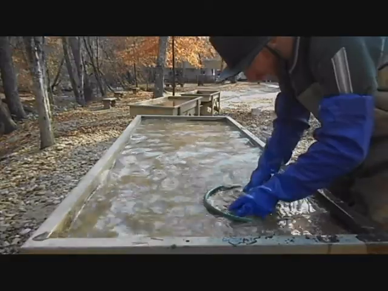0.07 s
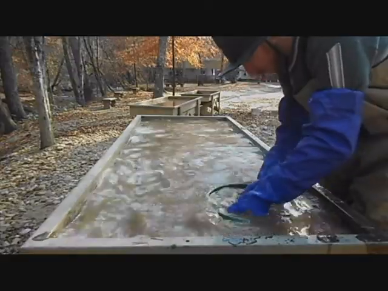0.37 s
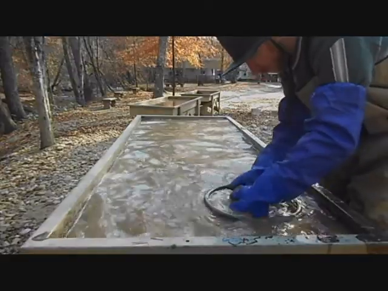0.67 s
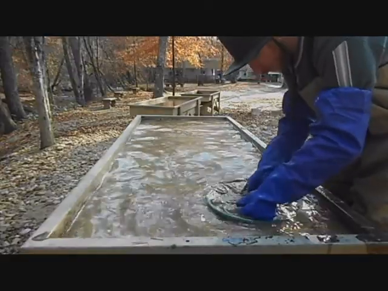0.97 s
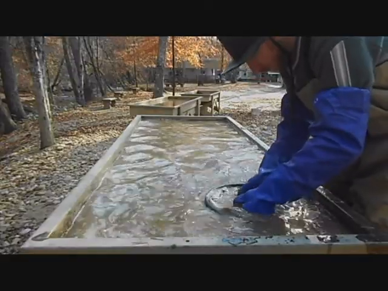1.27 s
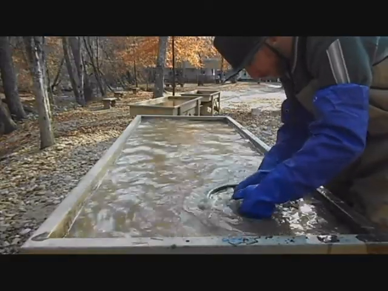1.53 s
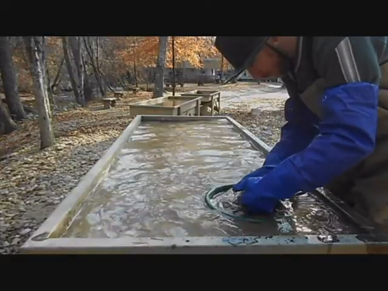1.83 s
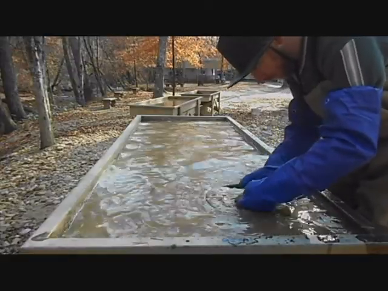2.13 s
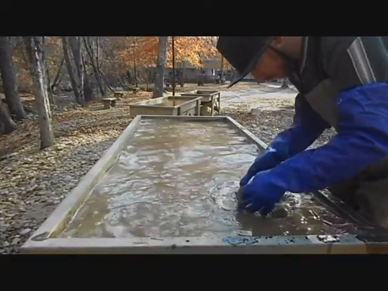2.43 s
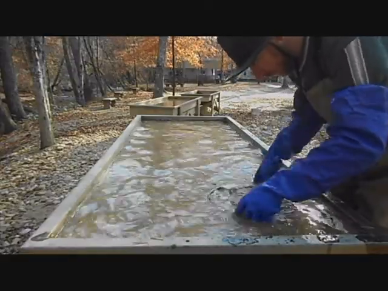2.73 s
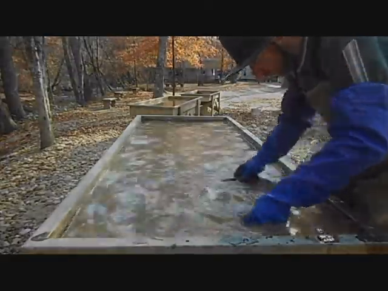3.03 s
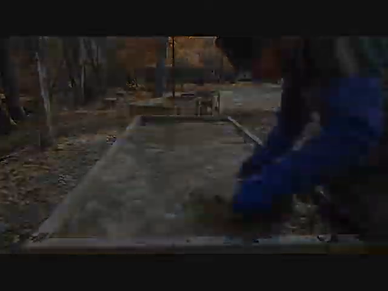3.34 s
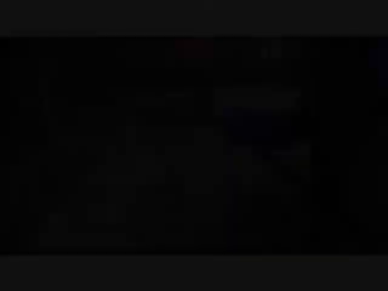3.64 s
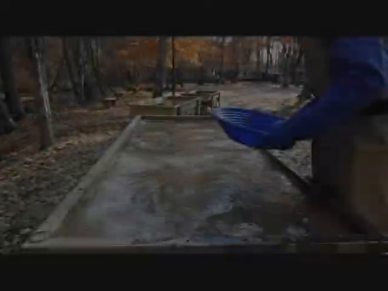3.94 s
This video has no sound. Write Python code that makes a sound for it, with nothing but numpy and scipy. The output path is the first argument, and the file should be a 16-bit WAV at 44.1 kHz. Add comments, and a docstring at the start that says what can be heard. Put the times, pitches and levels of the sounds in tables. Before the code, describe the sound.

Sloshing water in a trough as someone swirls a pan, with small plops and gritty clicks.

```python
"""Water churns as a prospector's pan is swirled in a muddy outdoor trough, throwing spray that falls back
in single plops. Air bubbles in the water ring as damped resonators; countless small splashes sum to noise.
Fine grit hisses and stones click in the pan, the pan is dunked with dull bumps, and a light wind rumbles
on the microphone. Near the end the whole sound fades away briefly and comes back."""
import sys
import numpy as np
from scipy import signal
from scipy.fft import rfft, irfft, next_fast_len
from scipy.io import wavfile
from scipy.ndimage import uniform_filter1d, map_coordinates

SR = 44100
rng = np.random.default_rng(int(sys.argv[2]) if len(sys.argv) > 2 else 0)


def transcribe(u):
    """Save the signal u as a 16-bit wav file named by the first command-line argument.

    u: samples, shape (n,) or (channels, n), limited to [-1, 1]; the rate is SR.
    q: integer samples, one column per channel.
    """
    v = np.clip(np.atleast_2d(u).T, -1, 1)
    q = np.round(v * 32767).astype(np.int16)
    wavfile.write(sys.argv[1], SR, q)


N = 176400
BUBBLE_RISE = 0.15  # fraction by which a small bubble's pitch climbs during its life


def churn():
    """Bubble resonance: water rolling round the pan traps large air pockets that ring within its wash."""
    # strength of the churning (time [s], level [dB])
    envelope = [(0.0, -31.5), (0.18, -24.5), (0.43, -27.5), (0.66, -27.5), (0.87, -32.5), (1.19, -29),
                (1.28, -33.5), (1.46, -32.5), (1.6, -37), (1.74, -42.5), (2.18, -40.5), (2.35, -36),
                (2.51, -48), (2.74, -42), (3.0, -40.5), (3.38, -40.5), (3.56, -52), (3.8, -54), (3.95, -44),
                (4.0, -51)]
    # spectrum of the churning (frequency [Hz], level [dB])
    spectrum = [(60, -35), (150, -23.5), (240, -8), (430, -4), (530, 2.5), (720, -4), (1010, 0), (1300, -4),
                (1650, -16), (3000, -38), (11000, -45)]
    swarm = bubbles(250.7, 1942, cycles=21, spread_db=2.5, count=1500, samples=1500)
    gurgle = unit(colour(swarm, spectrum))
    surge = amp(1.45 * wobble(30.13))
    wash = rush(spectrum, patchy_db=2.5)
    return level(envelope) * surge * (amp(-0.5) * wash + amp(-3) * gurgle)


def spray():
    """Incoherent summation: clumps of droplets and small bubbles merge into a dense, bright wash."""
    # strength of the thrown spray (time [s], level [dB])
    envelope = [(0.0, -34), (0.11, -28), (0.34, -24), (0.39, -31.5), (0.58, -25.5), (0.68, -30),
                (0.87, -35.5), (1.22, -33), (1.3, -36), (1.5, -33.5), (1.61, -35), (1.74, -54), (1.85, -44),
                (1.96, -48), (2.39, -43), (2.58, -48.5), (2.83, -49.5), (3.11, -44.5), (3.28, -35.5),
                (3.39, -39.5), (3.58, -57.5), (3.79, -63), (3.94, -55.5), (4.0, -58)]
    # spectrum of the spray (frequency [Hz], level [dB])
    spectrum = [(300, -32), (900, -12.5), (1400, -4.5), (1650, -1.5), (1950, 0.5), (2500, -3.5), (4100, -3),
                (4800, -4.5), (7000, -10.5), (11000, -21)]
    swarm = bubbles(940, 8560, cycles=7.6, spread_db=3.5, count=9000, samples=320)
    grains = unit(colour(swarm, spectrum))
    clumps = amp(1.1 * wobble(55))
    wash = rush(spectrum, patchy_db=2.7)
    return level(envelope) * clumps * (amp(-0.5) * wash + grains)


def drops():
    """Impact and air entrainment: a drop snaps and splats, then its air pocket rings amid faint spatter."""
    # drops and slaps (time [s], level [dB], pitch [Hz], bandwidth [octaves], decay time [s])
    impacts = [(0.2483, -16.5, 2060, 0.79, 0.0055), (0.265, -17.5, 2940, 0.9, 0.0018),
               (0.346, -14.5, 1960, 0.52, 0.0055), (0.408, -15.5, 1104, 0.29, 0.0024),
               (0.572, -16, 2300, 0.57, 0.0027), (0.6308, -19, 1040, 0.57, 0.0066),
               (0.633, -21, 1830, 1.3, 0.0059), (0.656, -16.5, 1240, 1.1, 0.0076),
               (0.731, -16, 4600, 0.37, 0.006), (0.755, -16, 3450, 0.94, 0.0017),
               (0.769, -8, 4700, 0.65, 0.0023), (0.773, -20.5, 3400, 1.3, 0.003),
               (0.7972, -12.5, 1660, 0.96, 0.0013), (0.8032, -18, 1590, 0.59, 0.0029),
               (0.824, -19.5, 1670, 0.38, 0.00084), (0.936, -16, 1740, 0.88, 0.0073),
               (1.2068, -16, 1980, 0.86, 0.0069), (1.227, -16.5, 950, 0.9, 0.0089),
               (1.238, -10, 2800, 0.61, 0.0013), (1.2436, -9, 2320, 0.5, 0.0014),
               (1.335, -23, 1263, 0.67, 0.0057), (1.4343, -17, 2070, 0.47, 0.0027),
               (1.445, -16.5, 1210, 1.2, 0.0022), (1.4628, -15.5, 1023, 0.83, 0.0029),
               (1.4871, -6, 1950, 1.04, 0.0041), (1.513, -11.5, 2530, 0.4, 0.00099),
               (1.525, -14.5, 2580, 0.67, 0.003), (1.553, -18, 3630, 0.47, 0.0023),
               (1.586, -16.5, 3480, 0.67, 0.0023), (1.6049, -16.5, 1415, 0.77, 0.0051),
               (1.676, -21, 2550, 0.41, 0.0021), (1.7039, -11.5, 2940, 0.21, 0.0021),
               (1.7143, -13.5, 2860, 0.77, 0.00053), (1.733, -17, 3000, 0.37, 0.0033),
               (1.747, -11, 4070, 0.58, 0.0037), (1.762, -16, 3540, 0.34, 0.0018),
               (1.7769, -13.5, 1670, 0.63, 0.0012), (1.782, -12.5, 2150, 0.71, 0.0022),
               (1.8406, -24.5, 2710, 0.48, 0.0016), (1.891, -21.5, 3500, 0.41, 0.0019),
               (1.921, -19, 1880, 0.66, 0.0019), (1.946, -27, 1000, 0.62, 0.006),
               (2.035, -29.5, 3900, 0.4, 0.0032), (1.983, -24.5, 3240, 0.7, 0.0046),
               (1.993, -16.5, 3690, 0.3, 0.0046), (2.008, -23.5, 2540, 0.98, 0.0045),
               (2.162, -26.5, 3090, 0.26, 0.0052), (2.243, -16.5, 930, 0.59, 0.0031),
               (2.306, -20.5, 2800, 0.41, 0.0026), (2.3873, -17.5, 2530, 0.42, 0.002),
               (2.395, -17, 2560, 0.65, 0.00148), (2.3985, -12.5, 3160, 0.9, 0.0052),
               (2.4013, -25, 2500, 0.37, 0.002), (2.412, -23, 1340, 0.7, 0.0021),
               (2.423, -14.5, 2300, 0.6, 0.0035), (2.4453, -16, 2230, 0.35, 0.0021),
               (2.451, -20, 2290, 0.41, 0.0041), (2.523, -23.5, 1500, 1.07, 0.0026),
               (2.546, -27.5, 1710, 0.68, 0.011), (2.634, -29.5, 1470, 1.2, 0.0053),
               (3.0985, -24, 2690, 0.4, 0.0032), (3.111, -25.5, 2400, 0.56, 0.0039),
               (3.411, -26, 2200, 0.46, 0.0025)]
    # tone colour of the drops (frequency [Hz], gain [dB])
    spectrum = [(100, -12.5), (500, -3.5), (1000, 2.5), (1600, -1), (2500, -1.5), (5000, -1.5),
                (7000, -5.0), (11000, -7)]
    attack_s, snap_s, hollow_cycles = 0.00008, 0.00021, 47
    out, t = np.zeros(N), np.arange(SR // 10) / SR
    for start, db, hz, octaves, decay_s in impacts:
        purity = np.exp(-octaves ** 2)  # narrow-band drops ring most clearly
        splat = amp(2) * burst(len(t), hz, octaves)
        ring = amp(-1) * purity * np.sin(2 * np.pi * hz * t)
        plop = (splat + ring) * np.exp(-(t / decay_s) ** 1.36)
        spatter = amp(-10.5) * band(rng.standard_normal(len(t)), hz, 0.46) * decay(t, t60=0.06)
        hollow = amp(-15) * purity * bubble(t, hz, hollow_cycles / hz, BUBBLE_RISE)
        u = t / snap_s - 2
        snap = amp(1.5) * octaves * (1 - 2 * u ** 2) * np.exp(-u ** 2)  # the first pressure pulse
        add(out, start, amp(db) * (plop + snap + hollow + spatter) * attack(t, attack_s))
    return colour(out, spectrum)


def gushes():
    """Sheet break-up: water swells over the rim and splits into a dense, clumped patter; a scrape of the pan
    near 2.2 s is made the same way."""
    # spills over the rim, and one scrape of the pan at 2.204 s (time [s], duration [s], level [dB], centre
    # frequency [Hz])
    spills = [(0.238, 0.036, -17, 2000), (0.29, 0.038, -25, 2720), (0.518, 0.19, -24, 3100),
              (0.716, 0.076, -32, 5030), (1.219, 0.015, -14, 2440), (1.725, 0.073, -28, 3460),
              (2.204, 0.062, -35, 3970), (2.386, 0.051, -26.5, 2600), (3.134, 0.068, -32, 4000),
              (3.141, 0.041, -30, 1000), (0.884, 0.074, -25.5, 1500), (3.19, 0.032, -32.5, 1790),
              (3.325, 0.041, -34, 780), (3.488, .03, -35.5, 4000)]
    out = np.zeros(N)
    for start, duration, db, hz in spills:
        noise, flutter = rng.standard_normal((2, SR // 4))
        clumps = amp(5.6 * unit(uniform_filter1d(flutter, size=90)))
        patter = band(noise * clumps, hz, octaves=0.54)
        progress = np.minimum(np.arange(len(noise)) / SR / duration, 1)
        swell = np.sqrt(np.abs(np.sin(np.pi * progress ** 0.59)))
        add(out, start, amp(db) * patter * swell)
    return out


def glugs():
    """Bubble pinch-off: air breaks free with a splash and rings, rising in pitch near the surface."""
    # larger, clearly ringing bubbles (time [s], level [dB], starting pitch [Hz], t60 [s])
    pockets = [(0.409, -19, 1060, 0.017), (0.8091, -12, 1630, 0.054), (2.242, -18.5, 900, 0.017),
               (3.053, -20, 1550, 0.051), (3.16, -24.5, 948, 0.17), (3.212, -19.5, 3820, .025)]
    jitter_rad = 0.49
    out, t = np.zeros(N), np.arange(SR // 6) / SR
    for start, db, hz, t60 in pockets:
        jitter_s = jitter_rad * wobble(500)[:len(t)] / (2 * np.pi * hz)
        ring = bubble(t + jitter_s, hz, t60, rise=0.5)
        splash = amp(-15.5) * burst(len(t), hz, octaves=0.59) * decay(t, t60 / 2)
        add(out, start, amp(db) * (ring + splash) * attack(t, 0.00055))
    return out


def crackle():
    """Shot noise: separate droplets pop at random above the wash while the pan is shaken hardest."""
    # strength of the popping (time [s], level [dB])
    envelope = [(0.0, -57), (0.4, -31), (0.57, -36.5), (0.78, -29), (0.87, -39), (1.15, -33.5), (1.3, -45),
                (1.52, -38.5), (1.85, -70)]
    pops = bubbles(1400, 6500, cycles=11, spread_db=4.5, count=1100, samples=400)
    return level(envelope) * unit(colour(pops, [(1000, -5), (3000, 4), (5000, -7.5), (8000, -11.5)]))


def grit():
    """Friction noise: fine sand hisses over the pan, with ticks from coarser grains."""
    # strength of the hiss (time [s], level [dB])
    envelope = [(0.0, -44.5), (0.33, -45.5), (0.65, -47), (0.8, -51), (1.11, -41), (1.25, -51),
                (1.53, -56.5), (1.95, -59), (2.26, -51.5), (2.46, -60.5), (2.72, -62), (2.81, -50.5),
                (2.95, -49.5), (3.05, -51.5), (3.27, -47.5), (3.36, -45.5), (3.58, -63.5), (3.8, -65),
                (3.94, -57), (4.0, -55)]
    # spectrum of the hiss (frequency [Hz], level [dB])
    spectrum = [(500, -35.5), (1800, -11.5), (4000, 4.5), (6500, 1.5), (8000, 2.5), (9400, 4), (10500, 1),
                (11200, -10)]
    ticks = bubbles(4500, 10500, cycles=16, spread_db=4, count=700, samples=250)
    hiss = rush(spectrum, patchy_db=3.0)
    return level(envelope) * (amp(10) * hiss + amp(4) * ticks)


def stones():
    """Hard impact: small stones touch the pan so briefly that their clicks lie high in the treble."""
    # stone strikes (time [s], level [dB])
    strikes = [(0.2643, -22), (0.445, -21), (0.6966, -19.5), (0.751, -14), (0.817, -22.5), (0.949, -20),
               (1.193, -18.5), (1.3333, -21.5), (1.485, -16), (1.874, -29), (1.9506, -30), (2.3973, -25.5),
               (2.8538, -26), (2.934, -29.5), (3.0962, -24.5)]
    out, t = np.zeros(N), np.arange(SR // 20) / SR
    contact = np.exp(-(t / 0.0022) ** 2)
    envelope = (contact + amp(-8.5) * decay(t, t60=0.013)) * attack(t, 0.00016)
    for start, db in strikes:
        add(out, start + 0.0011, amp(db + 2.5) * burst(len(t), hz=7650, octaves=0.66) * envelope)
    return out


def bumps():
    """Soft impact: the pan pushes into the water, and the gradual force gives a low thud."""
    # dunks of the pan (time [s], level [dB], centre frequency [Hz], t60 [s])
    dunks = [(0.139, -22, 103, 0.27), (.445, -15, 118, 0.076), (0.594, -22, 307, 0.33),
             (0.796, -28.5, 99, 0.15), (1.019, -32, 66.6, 0.15), (1.219, -19.5, 326, 0.056),
             (2.189, -30.5, 280, 0.24), (3.05, -26.5, 96.7, 0.18), (3.914, -33, 94, 0.24)]
    out, t = np.zeros(N), np.arange(SR // 3) / SR
    for start, db, hz, t60 in dunks:
        envelope = attack(t, 0.0031) * decay(t, t60)
        add(out, start, amp(db) * burst(len(t), hz, octaves=0.81) * envelope / envelope.max())
    return out


def wind():
    """Turbulence: uneven air pressure on the microphone makes a low rumble and one slow buffet."""
    # strength of the rumble (time [s], level [dB])
    envelope = [(0.0, -37), (0.14, -37.5), (0.28, -34), (0.55, -30), (0.8, -36), (1.3, -35), (1.45, -32),
                (1.6, -42.5), (1.98, -46), (2.24, -36), (2.54, -43.5), (2.77, -45.5), (2.94, -35),
                (3.01, -37.5), (3.11, -44.5), (3.55, -67), (3.78, -52), (3.92, -37), (4.0, -41)]
    # spectrum of the rumble (frequency [Hz], level [dB])
    spectrum = [(10, -28), (27, 3), (45, -5), (70, -3), (110, -10), (180, -8), (280, -18), (450, -29.5),
                (1500, -47)]
    buffet_start_s, buffet_length_s = 1.61, 0.33
    rumble = level(envelope) * amp(0.5 + 1.3 * wobble(15)) * rush(spectrum, patchy_db=1)
    swell = np.sin(np.pi * np.clip((np.arange(N) / SR - buffet_start_s) / buffet_length_s, 0, 1))
    return rumble + amp(-31.5) * swell * burst(N, hz=17, octaves=0.3)


def bubble(t, hz, t60, rise):
    """Damped oscillator whose pitch climbs by the fraction rise as it dies away."""
    phase = 2 * np.pi * hz * t * (1 + rise * np.minimum(t / t60, 1) / 2)
    return np.sin(phase) * decay(t, t60)


def bubbles(low_hz, high_hz, cycles, spread_db, count, samples):
    """Superposition of damped rings of random onset, pitch and strength, at rms 1."""
    onset, pitch, strength, life, polarity = rng.random((count, 5)).T[:, :, None]
    t = np.arange(samples) / SR
    hz = low_hz * (high_hz / low_hz) ** pitch
    t60 = cycles * (0.5 + life) / hz
    gain = amp(-spread_db * np.log(1 - 0.98 * strength)) * np.sign(polarity - 0.5)  # a few are loud
    rings = gain * np.sqrt(hz) * bubble(t, hz, t60, BUBBLE_RISE) * attack(t, 0.5 / hz)
    positions = (onset * N).astype(int) + np.arange(samples)
    return unit(np.bincount(positions.ravel(), rings.ravel(), N)[:N])


def rush(spectrum, patchy_db):
    """Coloured noise, modulated in random patches of time and frequency, at rms 1."""
    cells = signal.stft(rng.standard_normal(N), nperseg=512)[2]
    patches = uniform_filter1d(rng.standard_normal(cells.shape), size=6, axis=0)
    patches = uniform_filter1d(patches, size=4, axis=1)
    noise = signal.istft(cells * amp(patchy_db * unit(patches)), nperseg=512)[1][:N]
    return unit(colour(noise, spectrum))


def burst(samples, hz, octaves):
    """Band noise evened out by keeping only its instantaneous phase, at rms 1."""
    octaves = max(octaves, 0.2)
    phase = np.angle(signal.hilbert(band(rng.standard_normal(samples), hz, octaves)))
    return band(np.cos(phase), hz, 1.84 * octaves)


def band(x, hz, octaves):
    """Gaussian band-pass around hz on a log frequency axis, at rms 1."""
    return unit(filtered(x, lambda f: np.exp(-(np.log2((f + 1) / hz) / (2 * octaves)) ** 2)))


def colour(x, spectrum):
    """Spectral shaping by (frequency [Hz], gain [dB]) points on a log axis."""
    f, db = np.transpose(spectrum)
    return filtered(x, lambda hz: amp(np.interp(np.log(hz + 1), np.log(f + 1), db)))


def filtered(x, response):
    """Linear filtering: the spectrum of x times a frequency response."""
    size = next_fast_len(len(x) + 4096)
    return irfft(rfft(x, size) * response(np.fft.rfftfreq(size, 1 / SR)), size)[:len(x)]


def wobble(rate):
    """Smooth random modulation with rate knots a second."""
    return map_coordinates(rng.standard_normal(4000), [np.arange(N) * rate / SR], mode="wrap")


def level(envelope):
    """Gain per sample from (time [s], level [dB]) points."""
    return amp(np.interp(np.arange(N) / SR, *np.transpose(envelope)))


def attack(t, tau_s):
    """Exponential rise towards 1."""
    return 1 - np.exp(-t / tau_s)


def decay(t, t60):
    """Exponential fall of 60 dB in t60 seconds."""
    return np.exp(-np.log(1000) * t / t60)


def amp(db):
    """Decibels to gain."""
    return 10 ** (np.asarray(db) / 20)


def unit(x):
    """Scale to rms 1."""
    return x / np.sqrt(np.mean(x ** 2) + 1e-20)


def add(out, start_s, x):
    """Mix x into out from start_s on."""
    i = int(np.clip(round(start_s * SR), 0, N - 1))
    out[i:i + len(x)] += x[:N - i]


def scene():
    """Superposition: the pressures of all the sources add in one channel."""
    return (churn() + spray() + crackle() + grit() + drops() + stones() + glugs() + gushes()
            + bumps() + wind())[None]


def record(dry):
    """Gain, filtering and saturation: the level dips briefly, peaks are rounded, the top treble is cut."""
    # microphone response (frequency [Hz], gain [dB])
    response = [(20, 3.5), (500, -2), (1000, 1.5), (1600, -3), (3000, -1), (6000, -5.5), (10200, -7),
                (10700, -17.5), (11200, -43)]
    dip_start_s, dip_end_s, recovery_s, top_hz = 3.622, 3.695, 0.037, 11300
    t = np.arange(N) / SR
    recovery_db = -14 * np.exp(-np.abs(t - dip_end_s) / recovery_s)
    dip_db = np.where(t < dip_end_s, -25 * (t > dip_start_s), recovery_db)
    heard = colour(dry[0] * amp(uniform_filter1d(dip_db, size=200)), response)
    rounded = heard / (1 + (heard / 0.9) ** 6) ** (1 / 6)
    return filtered(rounded, lambda hz: hz < top_hz)[None]


dry = scene()
out = record(dry)
transcribe(out)
```